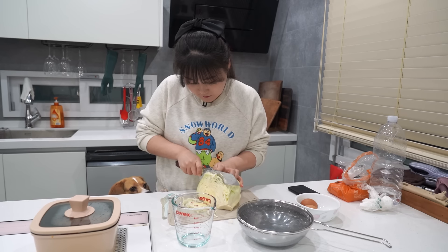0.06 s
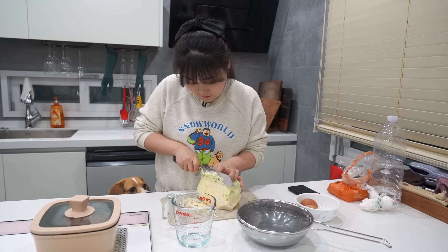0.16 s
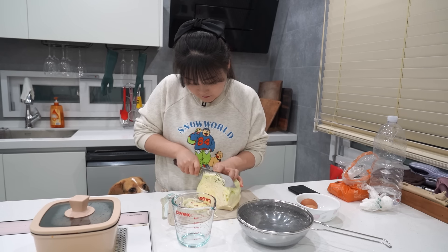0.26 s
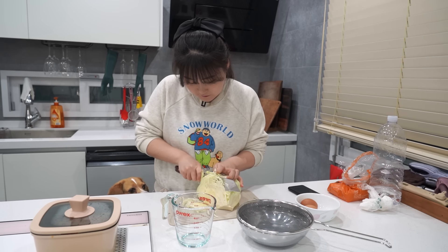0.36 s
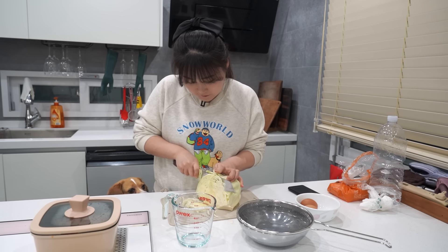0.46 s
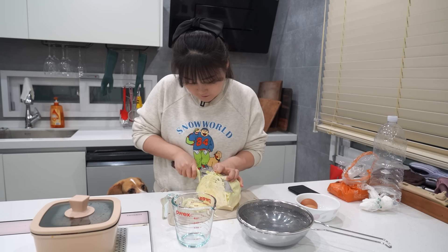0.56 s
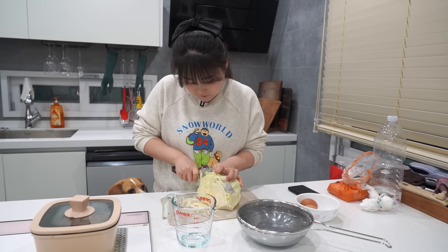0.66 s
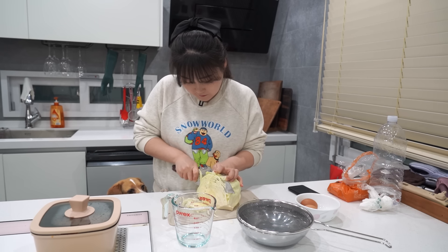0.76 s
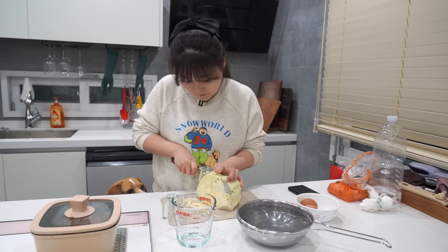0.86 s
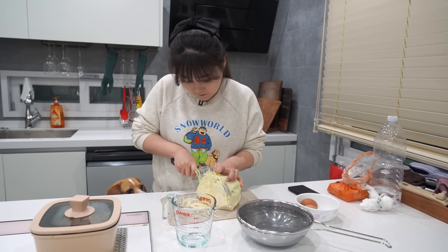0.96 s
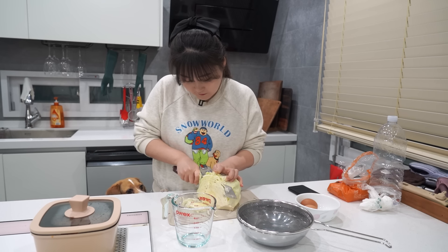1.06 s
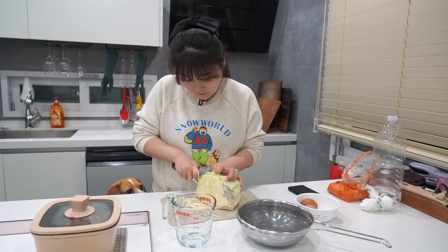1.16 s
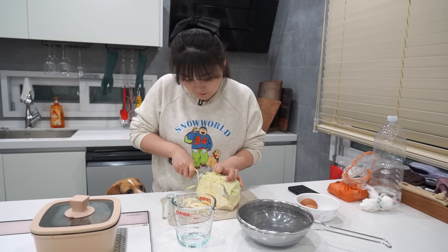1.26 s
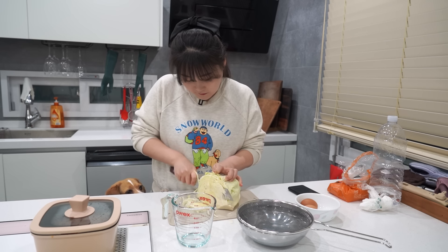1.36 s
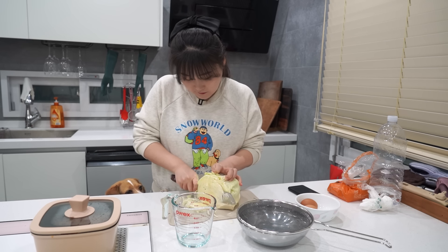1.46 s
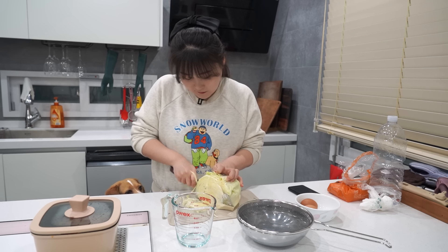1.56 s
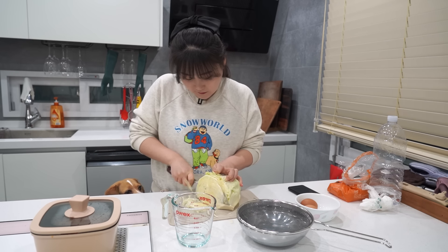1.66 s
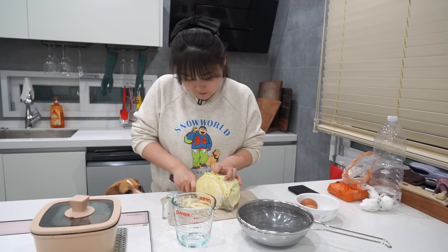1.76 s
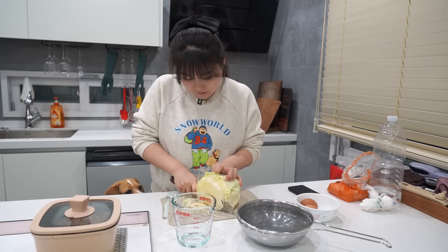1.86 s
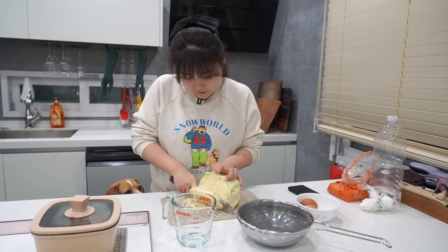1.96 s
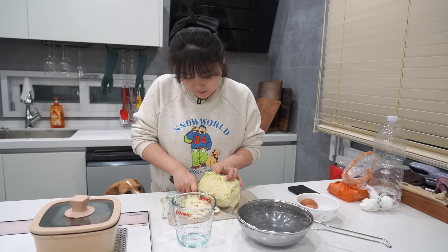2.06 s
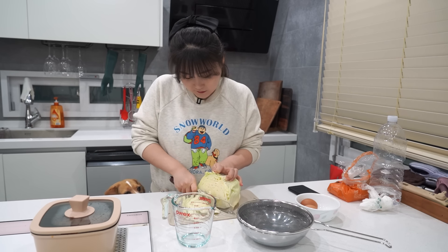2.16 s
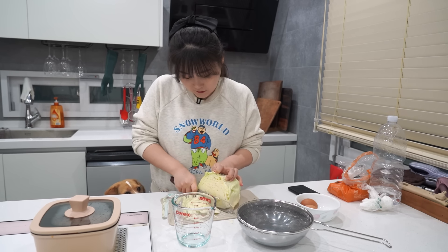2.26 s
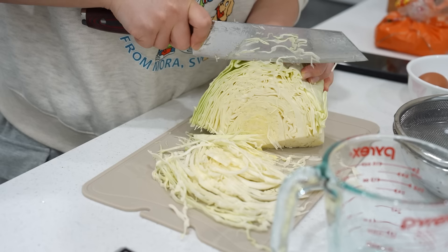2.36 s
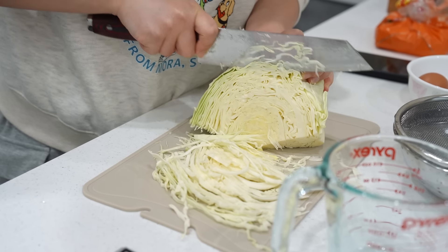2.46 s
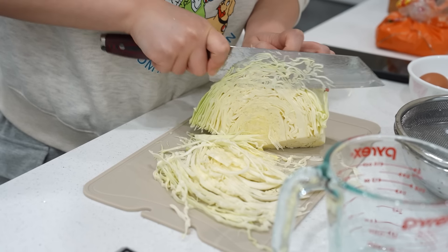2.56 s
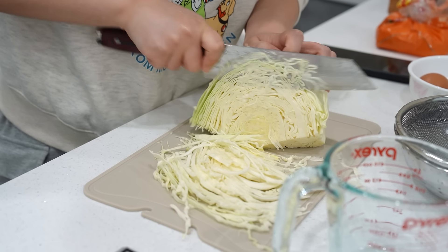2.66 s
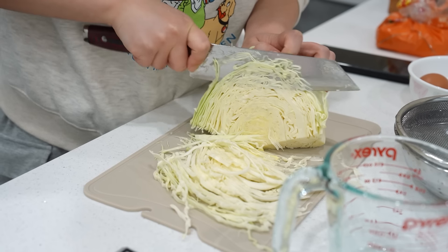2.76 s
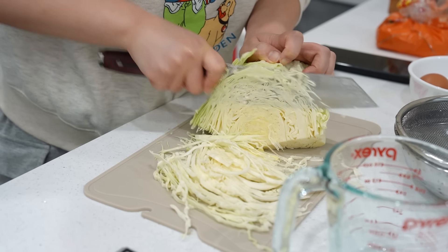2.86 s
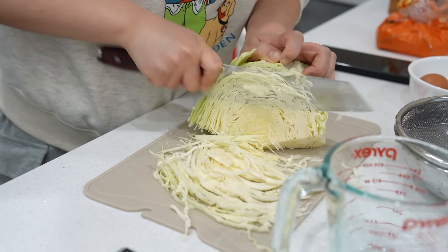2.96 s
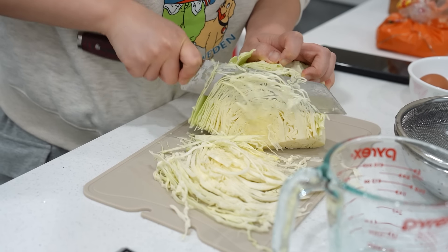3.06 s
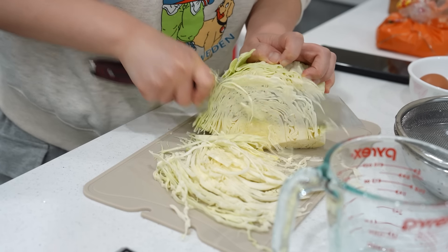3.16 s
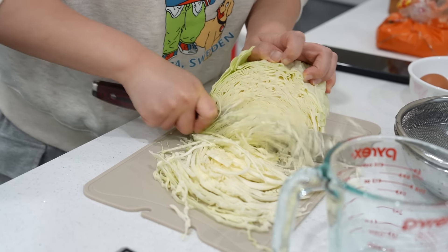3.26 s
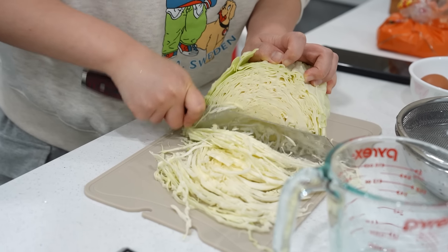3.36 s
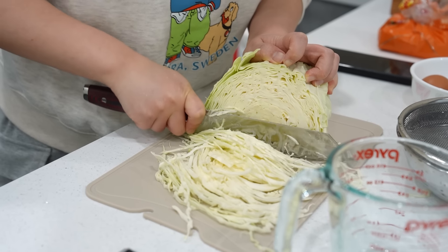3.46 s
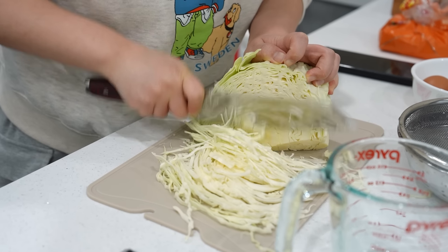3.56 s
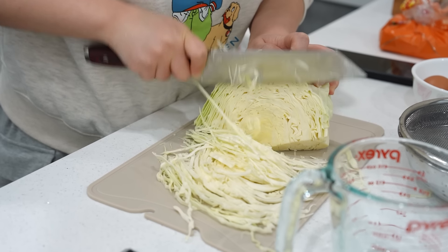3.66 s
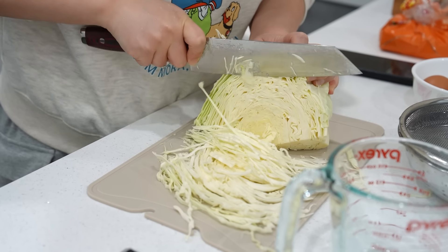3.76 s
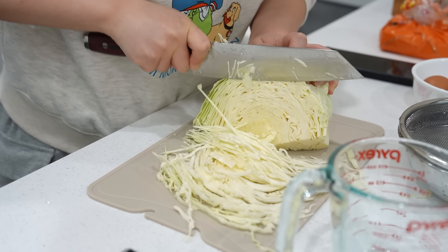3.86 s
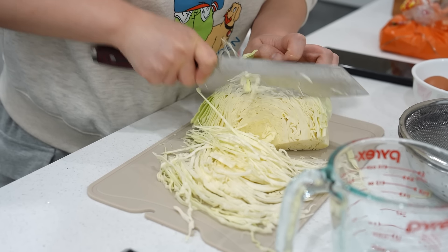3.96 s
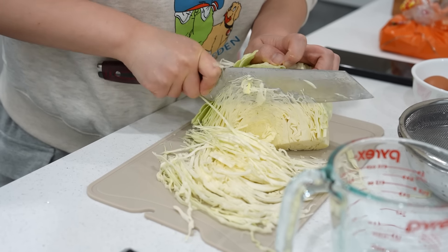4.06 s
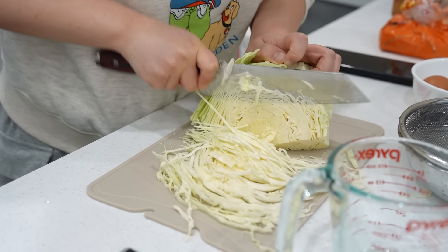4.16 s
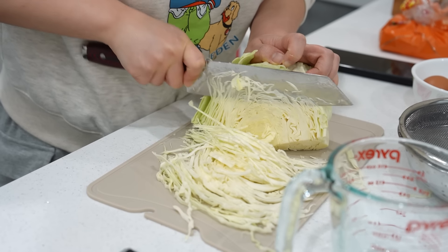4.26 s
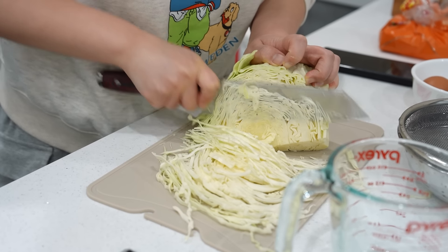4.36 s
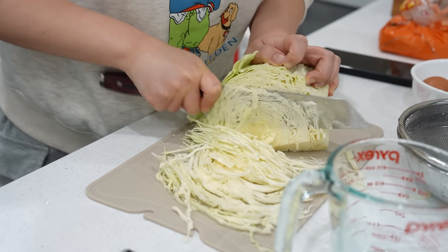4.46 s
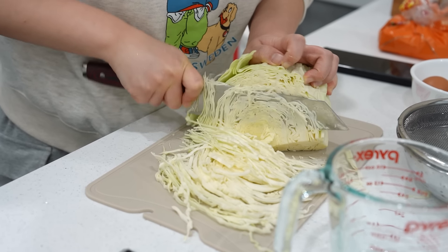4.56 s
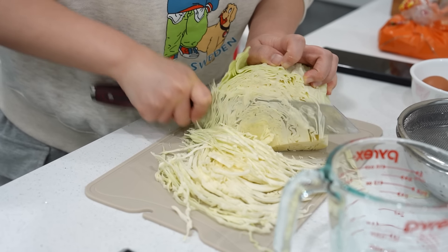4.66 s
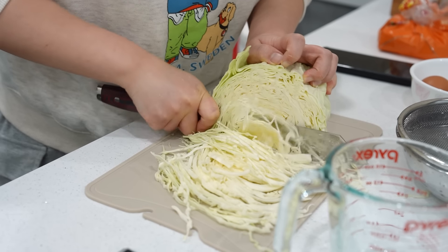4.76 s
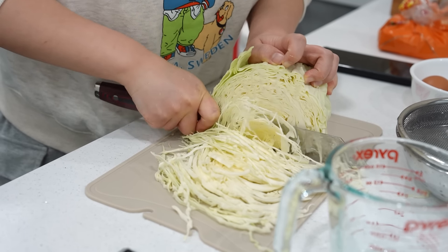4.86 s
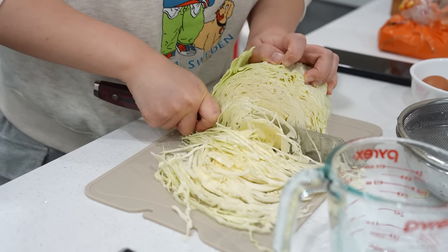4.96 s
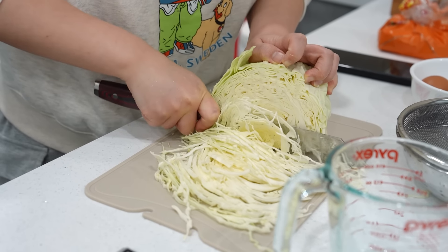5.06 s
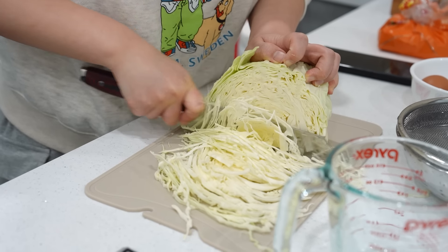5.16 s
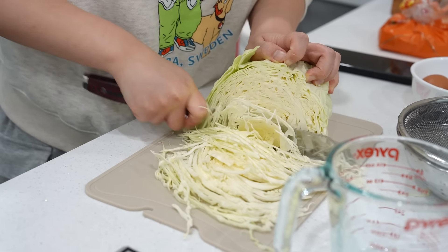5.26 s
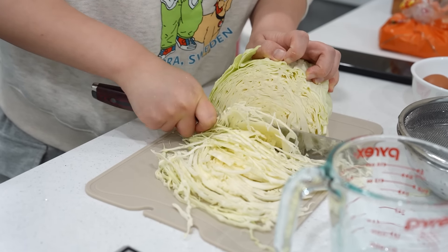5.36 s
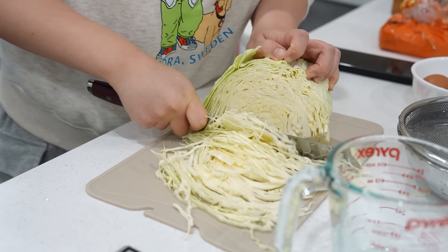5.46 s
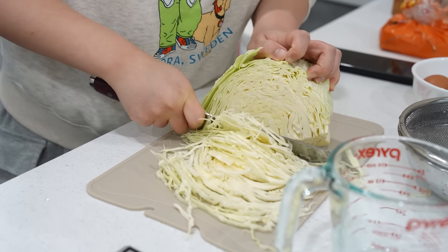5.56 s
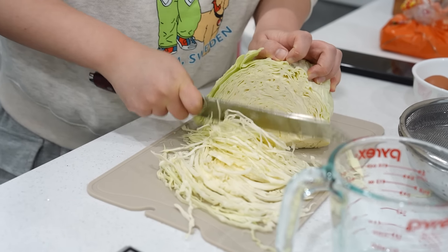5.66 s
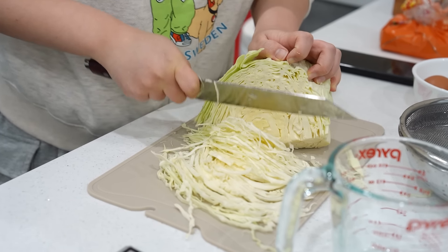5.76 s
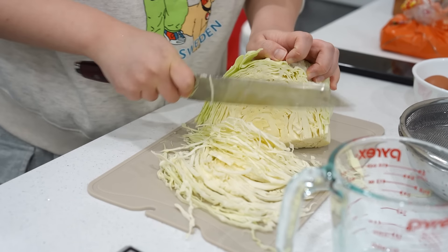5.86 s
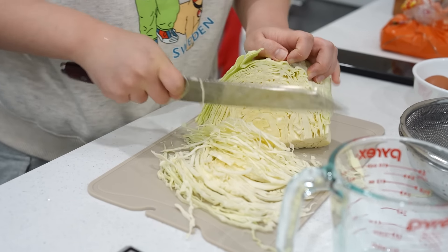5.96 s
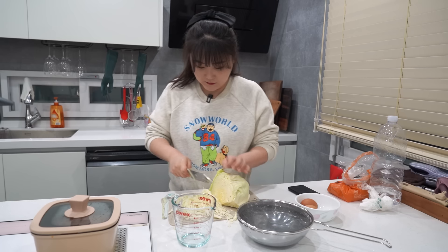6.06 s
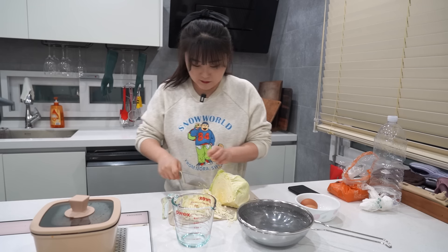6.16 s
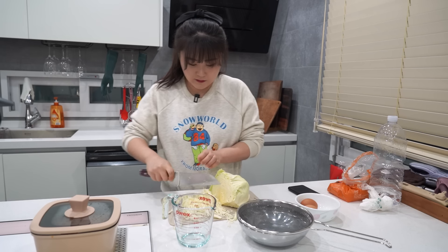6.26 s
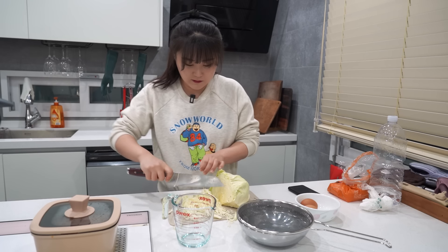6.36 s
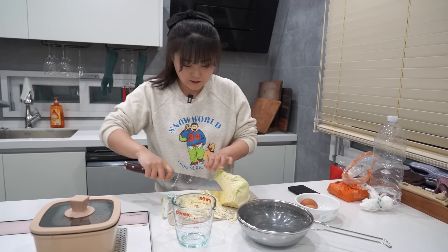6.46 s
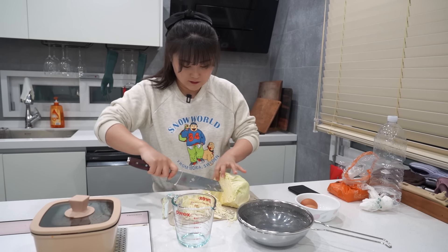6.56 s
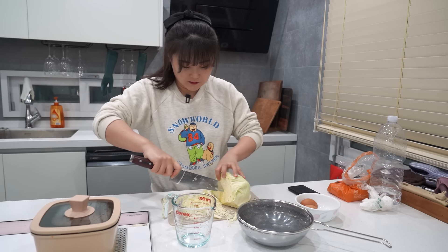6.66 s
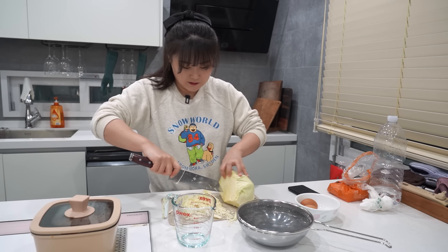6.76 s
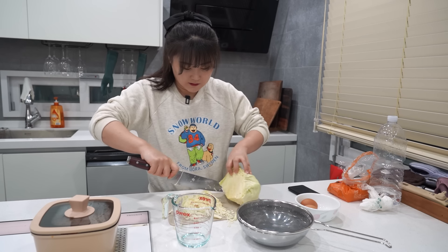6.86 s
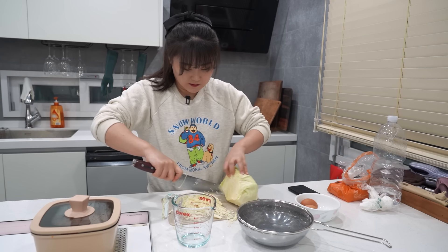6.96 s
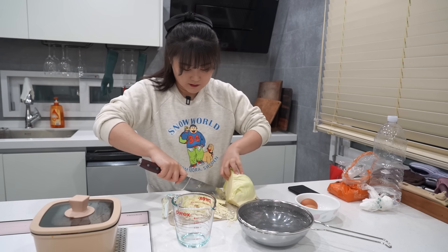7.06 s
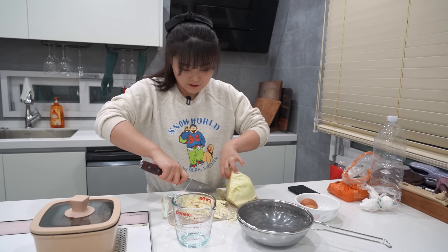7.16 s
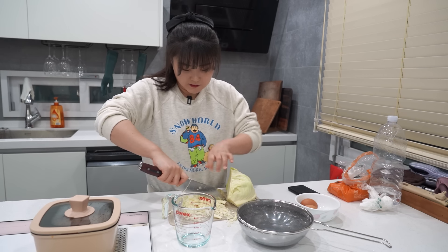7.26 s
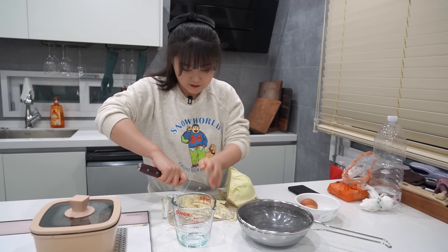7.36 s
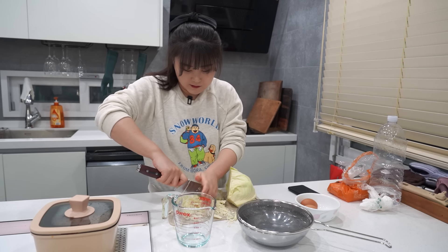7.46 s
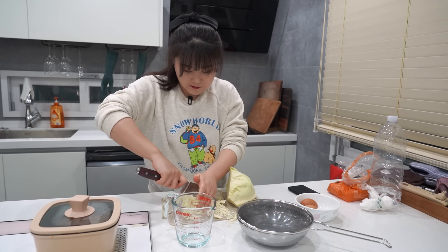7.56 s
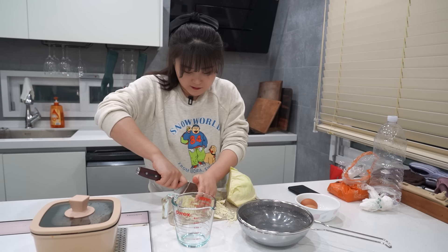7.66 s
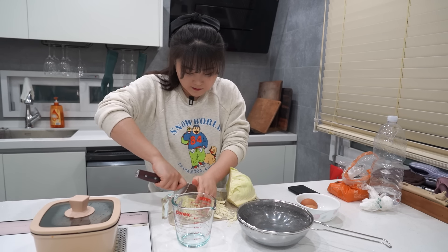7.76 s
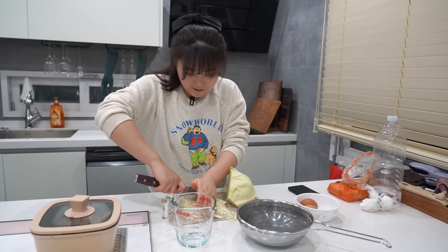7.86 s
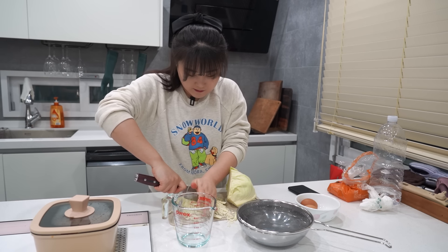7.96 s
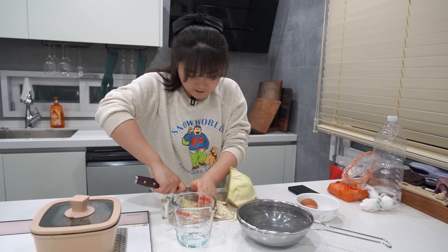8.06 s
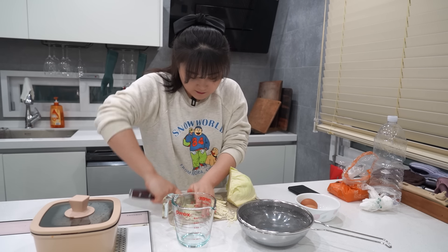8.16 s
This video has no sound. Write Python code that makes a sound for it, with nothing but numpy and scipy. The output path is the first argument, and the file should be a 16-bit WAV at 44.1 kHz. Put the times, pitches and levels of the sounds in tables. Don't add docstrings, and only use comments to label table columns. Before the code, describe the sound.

Close stereo sound of a long knife cutting half a cabbage on a plastic board, over low kitchen appliance hum and air. From 0 to 1.3 s short sawing strokes crackle through loose leaves, with small snaps and a soft bump at 0.7. From 1.3 to 2.1 the flat blade hisses on wet leaves, rising in pitch, and the edge lands sharply at 1.85. From 2.1 to 5 dense crunching pushes and lighter pulls snap thick ribs, loudest around 2.5 and 3.3, where a hard knock and tiny squeak coincide; a short tap at 3.75, a duller, booming landing at 4.8. From 5 shreds rustle quietly with scattered wet ticks. At 6.6 to 7.2 crisp snaps and a long, faint climbing hiss, then near quiet. Crunches and soft bumps return around 7.9 and 8.2. Blows echo briefly in the room.

```python
import sys
import numpy as np
from scipy import signal
from scipy.fft import rfft, irfft, next_fast_len
from scipy.io import wavfile
from scipy.ndimage import uniform_filter1d, map_coordinates

SR = 44100
rng = np.random.default_rng(int(sys.argv[2]) if len(sys.argv) > 2 else 0)


def voltage_ratio(level):
    return 10 ** (np.asarray(level, float) / 20)


def file_out(sig):
    cols = np.atleast_2d(sig).T
    lim = np.clip(cols, -1, 1)
    pcm = np.round(lim * 32767).astype(np.int16)
    wavfile.write(sys.argv[1], SR, pcm)


N = 362061


def unit(x):
    return x / np.sqrt(np.mean(x ** 2) + 1e-20)


def along(points, hz):
    point_hz, value = np.transpose(points)
    return np.interp(np.log(hz + 1), np.log(point_hz + 1), value)


def curves(rows):
    time_s, *columns = np.transpose(rows)
    return [np.interp(np.arange(N) / SR, time_s, column) for column in columns]


def wobble(rate):
    knots = rng.standard_normal(int(N * rate / SR) + 4)
    return map_coordinates(knots, [np.arange(N) * rate / SR])


def filtered(x, response):
    size = next_fast_len(N + SR // 2)
    gain = response(np.fft.rfftfreq(size, 1 / SR))
    return irfft(rfft(x, size) * gain, size)[..., :N]


def add(track, s, sound):
    part = track[max(round(s * SR), 0):][:len(sound)]
    part += sound[:len(part)]


# pitch_hz, level_db (per Hz)
KITCHEN_COLOUR = [(24, -47), (40, -6.5), (150, -7), (184, -6.5), (248, -6.5), (310, -2.5), (398, -9),
                  (700, -4), (1110, -5.5), (2000, -12.5), (3250, -30), (5230, 0), (7400, -20.5),
                  (10000, -15.5), (15700, -29)]


def kitchen():
    air = filtered(rng.standard_normal((2, N)), lambda hz: voltage_ratio(along(KITCHEN_COLOUR, hz)))
    return voltage_ratio(-53 + 1.2 * wobble(3.18)) * unit(air)


# pitch_hz, time_to_fall_60_db_s
ROOM_DECAY = [(100, 0.53), (1000, 0.57), (4000, 0.31), (12000, 0.12)]


def walls(x):
    noise = rng.standard_normal((2, SR // 2))
    hz, t, z = signal.stft(noise, SR, nperseg=256)
    fading = z * voltage_ratio(-60 * t / along(ROOM_DECAY, hz)[:, None])
    tail = signal.istft(fading, SR, nperseg=256)[1]
    delayed = np.pad(x, (250, 0))[None]
    return signal.fftconvolve(delayed, tail / np.linalg.norm(tail[0]), axes=1)[:, :N]


# middle_s, pitch_hz, level_db, length_s
SQUEAK_EVENTS = [
    (.668, 365, -38, .025),
    (1.107, 370, -37, .02),
    (2.895, 420, -34, .02),
    (3.286, 4500, -9, .007),
    (3.289, 2500, -10, .009),
    (4.248, 1040, -38, .02),
    (4.273, 530, -33, .035),
    (4.926, 1170, -39, .016),
]


def squeaks():
    out = np.zeros(N)
    t = np.arange(-2000, 2000) / SR
    for s, hz, db, length in SQUEAK_EVENTS:
        swell = np.exp(-(2 * t / length) ** 4)
        add(out, s + t[0], voltage_ratio(db) * np.sin(2 * np.pi * hz * t) * swell)
    return out


# time_s, pitch_hz, level_db
SLIDE_PATHS = [
    [(1.28, 4520, -49), (1.4, 4650, -44), (1.5, 4760, -35.5), (1.62, 4850, -36), (1.72, 4980, -33),
     (1.78, 5250, -31), (1.81, 5400, -40)],
    [(1.78, 5000, -36), (1.87, 5600, -33), (1.96, 5500, -36), (2.06, 5300, -42)],
    [(6.68, 4350, -43), (6.87, 4600, -42), (6.95, 4650, -46), (7.04, 4800, -41), (7.14, 5000, -40),
     (7.17, 5050, -43), (7.21, 5100, -54)],
    [(6.69, 5650, -42), (6.78, 5800, -39.5), (7.0, 6200, -43), (7.15, 6500, -51), (7.4, 6850, -57)],
    [(6.7, 2550, -48), (7.2, 2900, -49)],
    [(6.6, 2000, -52), (7.05, 2000, -50), (7.3, 2050, -48), (7.8, 2050, -53), (8.1, 2050, -53)],
    [(1.35, 2050, -44), (1.55, 2050, -41), (1.72, 2050, -44), (2.05, 2050, -42)],
    [(5.38, 2500, -46), (5.46, 2450, -41), (5.55, 2500, -50), (5.68, 2550, -49), (5.8, 2500, -55)],
    [(5.4, 520, -56), (5.6, 540, -55), (5.92, 600, -57)],
    [(5.6, 5800, -52), (5.73, 6000, -48), (5.85, 6000, -54)],
]
# width_hz, steady_share (0-1)
SLIDE_GRAINS = [(340, 1.0), (900, 0), (460, .3), (420, .35), (500, 0), (480, 0), (480, 0), (750, 0),
                (450, 0), (1100, 0)]


def slides():
    out, t = np.zeros(N), np.arange(N) / SR
    for rows, (width_hz, steady) in zip(SLIDE_PATHS, SLIDE_GRAINS):
        hz, db = curves(rows)
        from_ends = np.minimum(t - rows[0][0], rows[-1][0] - t)
        fade = np.clip(from_ends / .03, 0, 1)
        flutter = steady + wobble(width_hz) + 1j * wobble(width_hz)
        tone = np.exp(2j * np.pi * np.cumsum(hz) / SR)
        out += fade * voltage_ratio(db + 2 * wobble(30)) * np.real(flutter * tone)
    return out


def modes_ring(modes, steps, t):
    out = np.zeros(len(t))
    for (hz, level, t60), step in zip(modes, steps):
        drift = .034 * np.sqrt(hz / 300) * np.cumsum(step)
        out += voltage_ratio(level - 60 * t / t60) * np.sin(2 * np.pi * hz * t + drift)
    return out


# start_s, peak_db, contact_s, counter_db, board_db
KNOCK_EVENTS = [
    (.685, -43.5, 0.0054, 7, 11),
    (1.8466, -7.5, 0.0014, -5, 6.5),
    (3.303, -4.5, 0.00098, -9, 2),
    (3.761, -25.5, 0.00094, -12, -17),
    (4.087, -42.5, 0.0049, 11, 14.5),
    (4.783, -15.5, 0.0031, 3, -7.5),
    (7.386, -53, 0.0065, -5, -15),
    (7.901, -39, 0.0033, 9.5, 5),
    (8.17, -41, 0.0038, 11, -5),
]
# pitch_hz, level_db, time_to_fall_60_db_s
COUNTER_MODES = [(52, -5, .12), (95, -8, .12), (138, 0, 0.25), (178, -3, 0.2), (234, -8, 0.18)]
# pitch_hz, level_db, time_to_fall_60_db_s
BOARD_MODES = [(307, 0, .24), (361, -5, .15), (538, -7, .1), (624, -13, .12), (818, -12, .1),
               (1175, -17, .12), (1490, -12, .06)]


def knocks():
    out, t = np.zeros(N), np.arange(SR // 2) / SR
    chance = rng.standard_normal((len(KNOCK_EVENTS), len(BOARD_MODES) + 1, len(t)))
    chatter = signal.butter(2, (443, 1590), "bandpass", fs=SR, output="sos")
    for (s, db, contact, counter_db, board_db), (noise, *steps) in zip(KNOCK_EVENTS, chance):
        u = t / contact
        blow = -np.sin(np.pi * u) * (u / 1.5) ** 2 * np.exp(2 - u / .75)
        boom = voltage_ratio(counter_db) * modes_ring(COUNTER_MODES, steps, t)
        boom += voltage_ratio(board_db) * modes_ring(BOARD_MODES, steps, t)
        boom *= 1 - np.exp(-t / 0.0098)
        rattle = unit(signal.sosfilt(chatter, noise)) * voltage_ratio(board_db - 17 - 60 * t / 0.29)
        rattle *= 0.0011 / contact
        add(out, s, voltage_ratio(db) * (blow + voltage_ratio(-14.0) * boom + rattle))
    return out


# pitch_hz, level_db (per Hz)
CRUNCH_COLOUR = [(40, -21), (100, -19), (250, -17.5), (520, -5.5), (900, -11), (2100, -1), (3200, 3.5),
                 (5000, 9.5), (6300, 5), (7000, -2), (7600, -5.5), (10000, -4), (13000, -12), (15800, -30)]


def crunch_colour(hz):
    return voltage_ratio(along(CRUNCH_COLOUR, hz))


# start_s, peak_db, pitch_hz
LEAF_SNAPS = [(0.095, -16, 3060), (0.151, -10.5, 4630), (0.21, -21, 4600), (.2698, -20, 8950),
              (.305, -12, 6270), (0.5248, -25, 2460), (0.574, -30, 1840), (0.725, -25, 5710),
              (0.7457, -16.5, 5700), (0.8075, -20, 6060), (1.181, -19, 5050), (1.2523, -24, 2610),
              (1.6792, -34, 2130), (1.735, -7.5, 5650), (1.851, -4.5, 1200), (2.1143, -17.5, 1720),
              (2.1384, -15, 1780), (2.1454, -5, 1870)]
# start_s, peak_db, pitch_hz
RIB_SNAPS = [(2.3631, -14, 2560), (2.3907, -11.5, 2280), (2.4914, -18, 2220), (2.5345, 2, 4460),
             (2.7428, -14.5, 3100), (2.9291, -19, 5620), (3.1578, -27, 3490), (3.2859, 6, 3680),
             (3.589, -28.5, 1950), (3.5984, -23, 5000), (3.787, -25, 2240), (3.8176, -20, 3260),
             (3.9483, -11, 3640), (3.9596, -17, 3940), (3.9847, -6, 2240), (3.9913, -6, 4040),
             (4.0126, -7.5, 1790), (4.186, -21.5, 2290), (4.3306, -20, 2760), (4.3628, -15, 2630),
             (4.382, -19, 2630), (4.394, -11, 2500), (4.573, -11.5, 2750), (4.6948, -13.5, 2950),
             (4.8446, -10.5, 3700), (4.8578, -16, 2820), (4.871, -10, 3600), (4.8806, -10, 5600),
             (4.894, -10.5, 5560), (4.923, -11, 3400)]
# start_s, peak_db, pitch_hz
LOOSE_SNAPS = [(5.0526, -20, 5170), (5.2187, -20, 4390), (5.2798, -20.5, 5160), (5.3272, -21, 4250),
               (5.3701, -18.5, 3360), (5.3996, -34, 2540), (5.6282, -20, 2560), (5.6347, -25, 2670),
               (5.6553, -31.5, 3900), (5.6625, -16.5, 2590), (5.808, -22.5, 4440), (5.979, -26, 2430),
               (6.0757, -28.5, 1960), (6.233, -12.5, 10500), (6.2807, -17.5, 5800), (6.3095, -16.5, 3996),
               (6.6269, -14, 4280), (6.6268, -17.5, 2350), (6.6429, -15, 10500), (6.7364, -12, 5560),
               (6.7372, -21, 1900), (6.7904, -11, 4450), (7.8447, -17, 3420), (7.8815, -19, 4740),
               (7.904, -4.5, 5430), (8.125, -13.5, 5460), (8.1389, -24, 2580), (8.166, -8.5, 6300),
               (8.1822, -22, 6400), (8.1916, -12, 5300), (8.1982, -10, 3270)]
# start_s, peak_db, pitch_hz
MORE_SNAPS = [(.619, -27, 5730), (.8175, -22, 3200), (1.0056, -18, 6290), (2.129, -25, 1700),
              (2.1355, -16, 2800), (2.16, -18, 1570), (2.1665, -22, 2020), (2.3153, -36, 3950),
              (2.4311, -20, 5470), (2.471, -14, 5580), (5.1283, -25, 3410), (5.1477, -30, 2050),
              (5.1532, -23, 2900), (5.168, -23, 2980), (5.178, -25, 4050), (5.3513, -25, 2990),
              (5.445, -23, 4200), (5.456, -20, 2400), (5.468, -24, 3900), (5.6305, -14, 4025),
              (5.9554, -31, 5670), (5.993, -34, 3800), (6.001, -33, 1900), (6.0462, -29, 2170),
              (6.2083, -31, 5570), (6.5482, -32, 9880), (6.5717, -27, 10100), (6.7084, -31, 11800),
              (6.81, -33, 13000), (6.8191, -28, 12100), (6.828, -32, 12500), (6.852, -36, 12500),
              (6.866, -33, 13000), (6.8969, -30, 11000), (6.901, -32, 13100), (7.0192, -32, 11800),
              (7.121, -33, 12600), (7.524, -26, 13000), (7.533, -28, 12000), (7.545, -33, 13500),
              (7.56, -34, 12500), (6.685, -24, 2200), (2.243, -43, 3970), (2.292, -39, 5000),
              (2.302, -45, 5140), (1.408, -21, 1800), (1.808, -16, 4650)]
# start_s, peak_db, pitch_hz, push_db (against the peak)
JOLTING_SNAPS = [(2.4527, -17.5, 3470, -8), (3.0615, -12.5, 4400, -22), (3.3035, -2.5, 2090, -17),
                 (3.7614, -16, 2360, -7.5), (4.6144, -14.5, 2260, -12.5), (4.6196, -16, 5560, -24),
                 (4.7833, -10, 1620, -10), (5.422, -29, 3210, -7), (5.7789, -26.5, 1730, -11),
                 (5.9011, -27, 5530, -15), (6.7183, -13, 4370, -20), (6.7293, -16, 4390, -18),
                 (6.7502, -10, 4410, -15), (6.88, -17, 1880, -34), (6.905, -23, 2780, -7.5),
                 (6.999, -18, 4800, -8.5), (7.024, -22, 1720, -20), (7.053, -28, 1300, -8),
                 (7.11, -25, 4900, -6)]


def snaps():
    rings, cracks, pushes = np.zeros((3, N))
    t = np.arange(900) / SR
    push_db = -29
    thin = LEAF_SNAPS + RIB_SNAPS + LOOSE_SNAPS + MORE_SNAPS
    rows = [(*row, push_db) for row in thin] + JOLTING_SNAPS
    chance = rng.standard_normal((len(rows), len(t)))
    for (s, db, hz, body_db), noise in zip(rows, chance):
        overtone = voltage_ratio(-5) * (hz < 4000) * np.sin(2 * np.pi * 1.8 * hz * t)
        ring = (np.sin(2 * np.pi * hz * t) + overtone) * np.exp(-t * hz / 2.4)
        head = min(.3, 900 / hz) * (hz < 7000) * np.sin(2 * np.pi * 2000 * t) * voltage_ratio(-60 * t / .008)
        push = np.sin(2 * np.pi * 560 * t) * voltage_ratio(-60 * t / .02) * (1 - np.exp(-t / .001))
        crack = noise * voltage_ratio(-60 * t / .003)
        crack_db = db - 5 - 10 * (hz > 7000)
        add(rings, s - .0002, voltage_ratio(db - 2.5) * (ring + head))
        add(cracks, s - .0002, voltage_ratio(crack_db) * crack / np.abs(crack).max())
        add(pushes, s, voltage_ratio(db + body_db + 3) * push)
    crisp = rings + filtered(cracks, crunch_colour)
    no_bass = signal.butter(3, 1050, "highpass", fs=SR, output="sos")
    return pushes + signal.sosfilt(no_bass, crisp)


def crackle(count, pitch_hz, spread, cycles, scatter_db):
    when, tone, size, phase = rng.random((4, count))
    hz = np.clip(pitch_hz * np.exp(spread * (2 * tone - 1)), 200, 15000)[:, None]
    k = np.arange(64)
    gain = voltage_ratio(-scatter_db * np.clip(np.log(size + 1e-9), -5, 0))[:, None]
    waves = np.sin(2 * np.pi * (hz * k / SR + phase[:, None]))
    grains = gain * waves * np.exp(-k * hz / SR / cycles)
    at = (when * N).astype(int)[:, None] + k
    return unit(np.bincount(at.ravel(), grains.ravel(), N + 64)[:N])


def patchy(x, depth_db):
    z = signal.stft(x, nperseg=256)[2]
    field = uniform_filter1d(rng.standard_normal(z.shape), 5, 0)
    field = uniform_filter1d(field, 9, 1)
    return signal.istft(z * voltage_ratio(depth_db * unit(field)), nperseg=256)[1][:N]


def slips(rate, fall):
    jumps = (rng.random(N) < rate / SR) * rng.random(N)
    steps = signal.lfilter([1], [1, -np.exp(-1 / (fall * SR))], jumps)
    return unit(steps - uniform_filter1d(steps, size=SR // 20))


def pressure(rows):
    t = np.arange(0, N, 32) / SR
    s, db_down, rise, hold, fall = np.abs(np.transpose(rows))[..., None]
    before = np.clip(s - t, 0, None)
    after = np.clip(t - s - hold, 0, None)
    slope_db = 20 * (before / rise + after / fall)
    return np.interp(np.arange(N) / SR, t, voltage_ratio(-2 * (db_down + slope_db)).sum(0))


# full_pressure_s, crunch_db, rise_s (per 20 dB), hold_s, fall_s (per 20 dB)
OUTER_STROKES = [
    (0, -20, .05, .045, .062),
    (.147, -30, .06, .004, .095),
    (.325, -20.5, .06, .05, .145),
    (.64, -25.5, .06, .038, .075),
    (.836, -32.5, .06, .012, .11),
    (1.055, -23, .07, .045, .065),
    (1.195, -30.5, .09, .012, .1),
]
HEART_STROKES = [(2.147, -47, .003, 0.0074, 0.08), (2.37, -27, 0.02, 0.0015, 0.069),
                 (2.487, -13.5, 0.034, 0.00082, 0.064), (2.55, -15, 0.071, 0.06, 0.053),
                 (2.66, -31, 0.063, 0.087, 0.11), (2.881, -18.5, 0.071, 0.059, 0.045),
                 (2.975, -29.5, 0.033, 0.092, 0.028), (3.17, -29, 0.022, 0.045, 0.12),
                 (3.275, -13.5, 0.15, 0.023, 0.085), (3.462, -33, 0.046, .001, 0.17),
                 (3.761, -28, 0.0031, 0.0014, 0.081), (3.896, -24.5, 0.016, 0.084, 0.18),
                 (3.99, -17.5, 0.04, 0.064, 0.095), (4.223, -25, 0.062, 0.00065, 0.13),
                 (4.378, -18.5, 0.047, 0.084, 0.03), (4.49, -25, 0.046, 0.078, 0.07),
                 (4.617, -34, .07, .001, 0.059), (4.774, -13.5, 0.15, 0.0017, 0.056),
                 (4.866, -26.5, 0.11, .001, 0.15), (4.924, -29, 0.015, 0.031, 0.09)]
SHRED_STROKES = [(5.056, -40, 0.034, 0.00052, 0.051), (5.153, -30.5, 0.061, .001, 0.096),
                 (5.226, -37, 0.077, .001, 0.16), (5.45, -30.5, 0.26, .001, 0.12),
                 (5.667, -36, 0.44, .001, 0.45), (5.991, -39, 0.084, .001, 0.14),
                 (6.049, -33.5, 0.028, 0.00128, 0.12), (7.5, -40.5, 1, 0.29, 0.143),
                 (7.9, -26.5, 0.14, 0.0065, 0.074), (7.98, -39, .1, 0.08, 0.16),
                 (8.2, -23.5, 0.095, .01, .1)]
GLIDE_STROKES = [
    (1.43, -24.5, 0.27, 0.034, 0.51),
    (1.83, -21, 0.2, 0.019, 0.37),
    (1.95, -30, 0.12, 0.079, .12),
    (6.565, -33, 0.052, 0.0072, 0.2),
    (6.72, -34.5, 0.12, .38, .7),
]


def strokes():
    resting = np.full(N, voltage_ratio(2 * -55.5))
    powers = [pressure(rows) for rows in (OUTER_STROKES, HEART_STROKES, SHRED_STROKES, GLIDE_STROKES)]
    powers.append(resting)
    # body_db, husk_db, fizz_db of each material, against its crunch
    tones = [(-13.5, -17.5, -7.5),
             (-14.5, -20.5, -11),
             (-12.5, -21.5, -13),
             (-14.5, -16, -10.5),
             (-26, -24, -6.5)]
    body, husk, fizz = voltage_ratio(2 * np.transpose(tones)) @ powers
    body_lag_s = 0.0054
    keep = np.exp(-1 / (body_lag_s * SR))
    body = signal.lfilter([1 - keep], [1, -keep], body, zi=[keep * body[0]])[0]
    return np.sqrt([sum(powers), body, husk, fizz])


def above(hz, edge_hz, order):
    return 1 / (1 + (edge_hz / (hz + 1)) ** order)


# time_s, grit (0 smooth slide to 1 sawing crackle), brightness_db, wetness_db (feeds the fizz)
BLADE_MANNER = [(0, 0.5, -15, 1), (1.3, 0.77, 2, -3), (1.45, 0.31, 0.5, 2), (1.75, 0.18, 3.5, 0.5),
                (2.05, 0.2, -3, 6), (2.2, 0.74, -8.5, -2), (5.0, 0.65, -3, -5.5), (6.2, 0.88, -7.5, 5),
                (6.6, 0.17, 1, 0.5), (7.49, 0.54, -3, -3), (7.53, 0.5, -7, 1.5), (7.93, 0.67, -1, 5.5),
                (8.05, 0.27, -16, -8), (8.21, 0.67, 4, 9.5)]


def cutting():
    crunch_gain, body_gain, husk_gain, fizz_gain = strokes()
    grit, bright_db, wet_db = curves(BLADE_MANNER)
    grit = np.clip(grit, 0, 1)
    clumps = voltage_ratio(2.2 * grit * np.clip(slips(90, .008), -2, 2.8))
    cells = crackle(count=24000, pitch_hz=3190, spread=1.59, cycles=0.88, scatter_db=2)
    cell_colour = [(300, -1.5), (2000, 3), (6000, 2.0), (14000, -18)]
    white = filtered(cells, lambda hz: 1 / voltage_ratio(along(cell_colour, hz)))
    raw = clumps * (np.sqrt(grit) * unit(white) + np.sqrt(1 - grit) * rng.standard_normal(N))
    raw = patchy(raw, depth_db=1.5)

    def band(shape):
        return unit(filtered(raw, lambda hz: crunch_colour(hz) * shape(hz)))

    body = band(lambda hz: 1 - above(hz, 977, order=6))
    husk = band(lambda hz: above(hz, 906, order=6) * (1 - above(hz, 1620, order=6)))
    dull = band(lambda hz: above(hz, 1697, order=6) * (1 - above(hz, 2580, order=4)))
    crisp = band(lambda hz: above(hz, 4070, order=4) * (1 - above(hz, 5930, order=16)))
    fizz = band(lambda hz: above(hz, 5770, order=16))
    crunch = (dull + voltage_ratio(bright_db) * crisp) / np.sqrt(1 + voltage_ratio(2 * bright_db))
    low = voltage_ratio(1.5) * (body_gain * body + husk_gain * husk)
    high = voltage_ratio(6.0 + wet_db) * fizz_gain * fizz
    return voltage_ratio(-5.5) * (crunch_gain * crunch + low + high)


def scatter(x):
    k = np.arange(4000)
    smear = rng.standard_normal(4000) * voltage_ratio(-60 * k / SR / .08)
    return signal.fftconvolve(x, smear / np.linalg.norm(smear))[:N]


# pitch_hz, side_minus_middle_db
STEREO_WIDTH = [(60, -6), (400, -7), (1200, -10.5), (2400, -15), (4500, -18), (6500, -15), (9000, -7),
                (11000, -2), (13000, 12), (15500, 22)]
# pitch_hz, share (minus leans right)
STEREO_LEAN = [(60, .85), (300, .85), (700, .6), (2500, .6), (5000, .2), (9000, -.5), (13000, -.25)]
# time_s, extra_width_db (of the crunch band)
WORK_POSITION = [(0, 0), (1.3, 0), (1.5, -6), (2.08, -7), (2.2, 2), (3.2, 2), (5.3, 3), (5.6, -1), (6.5, 0),
                 (6.65, -7), (7.5, -7), (7.6, -1), (8.21, 0)]


def two_microphones(near, far):
    def lean(hz):
        return np.clip(along(STEREO_LEAN, hz), -1, 1)

    def width(hz):
        return voltage_ratio(along(STEREO_WIDTH, hz))

    side = filtered(near, lambda hz: width(hz) * lean(hz))
    side += filtered(scatter(near), lambda hz: width(hz) * np.sqrt(1 - lean(hz) ** 2))
    crunch_side = filtered(side, lambda hz: (hz > 1800) & (hz < 8500))
    side += (voltage_ratio(curves(WORK_POSITION)[0]) - 1) * crunch_side
    far_width = [(60, 10.4), (400, 0.77), (2000, 7.6), (9000, 0.61)]  # pitch_hz, extra_width_db
    side += filtered(far[1], lambda hz: width(hz) * voltage_ratio(along(far_width, hz)))
    mid = near + far[0]
    return np.array([mid + side, mid - side])


def scene():
    hits = snaps() + knocks()
    near = cutting() + slides() + squeaks() + hits
    far = voltage_ratio(-14.5) * walls(hits) + kitchen()
    return two_microphones(near, far)


def low_pass(x):
    return signal.sosfilt(signal.butter(12, 15840, fs=SR, output="sos"), x)


def record(dry):
    no_rumble = signal.butter(2, 55, "highpass", fs=SR, output="sos")
    thin = signal.sosfilt(no_rumble, dry)
    mix = thin / (1 + np.abs(thin) ** 12) ** (1 / 12)
    return low_pass(mix)


dry = scene()
out = record(dry)
file_out(out)
```